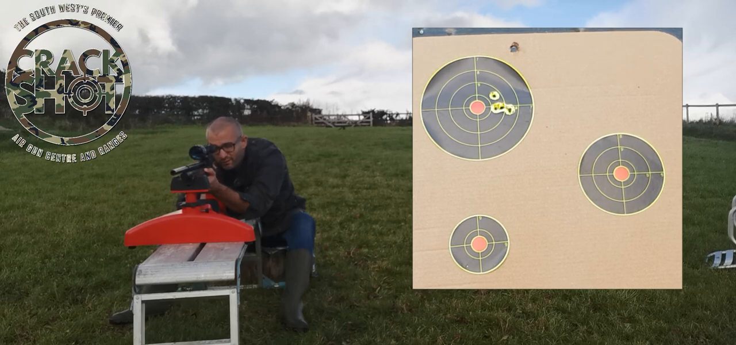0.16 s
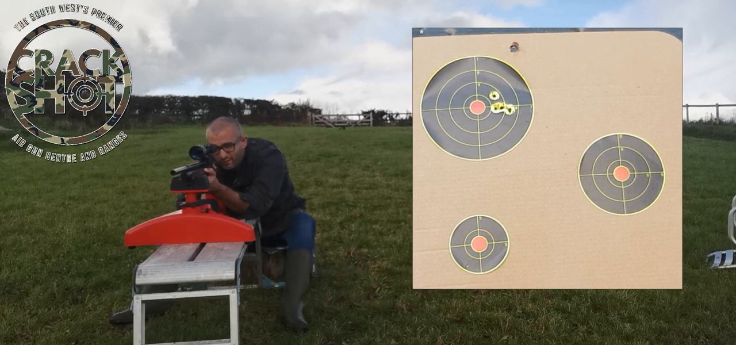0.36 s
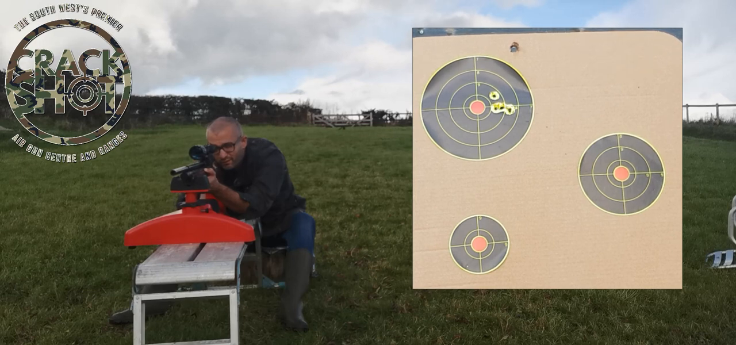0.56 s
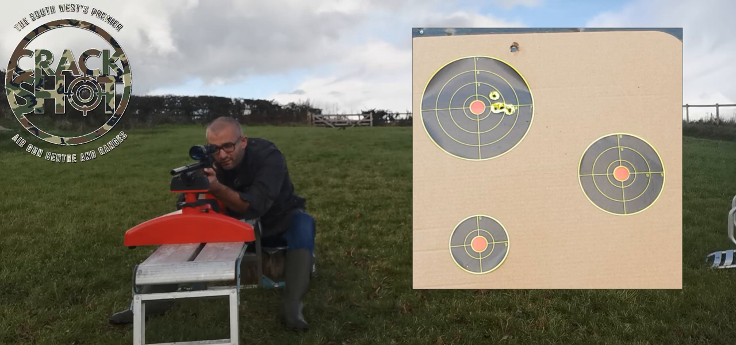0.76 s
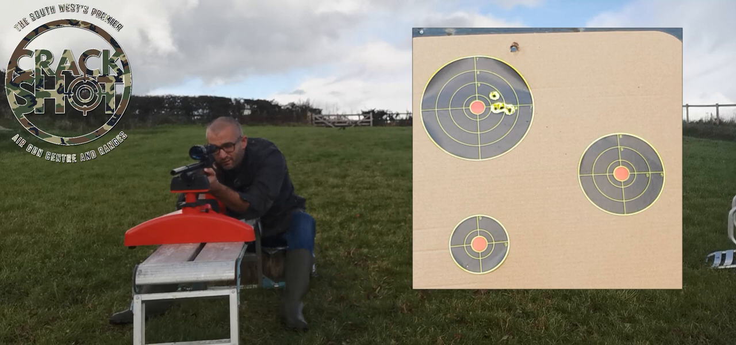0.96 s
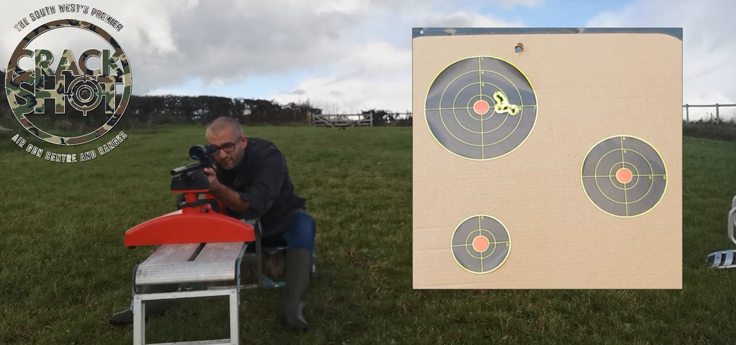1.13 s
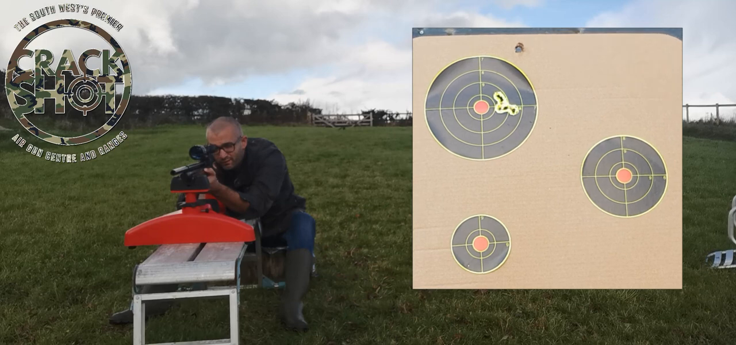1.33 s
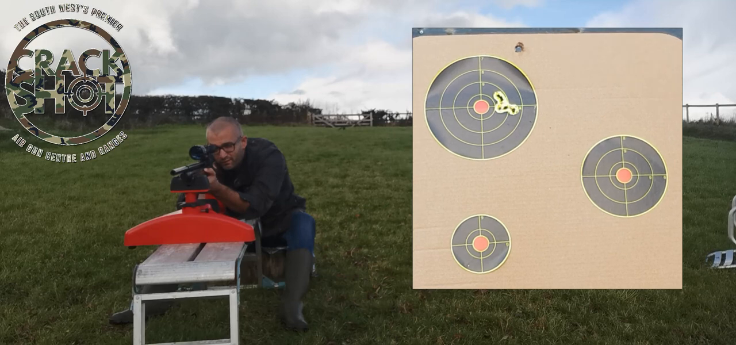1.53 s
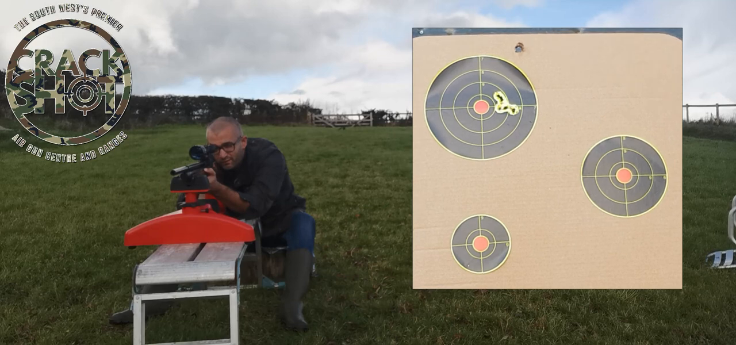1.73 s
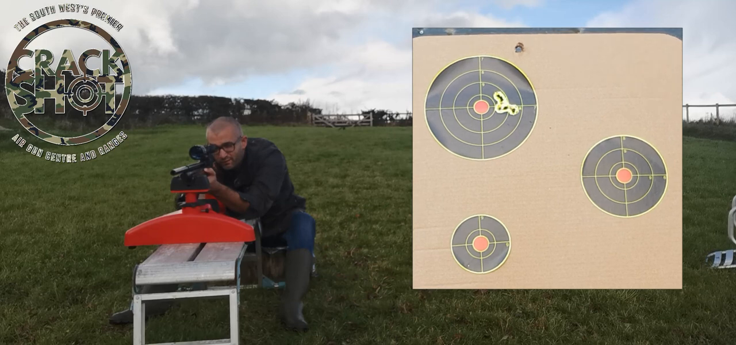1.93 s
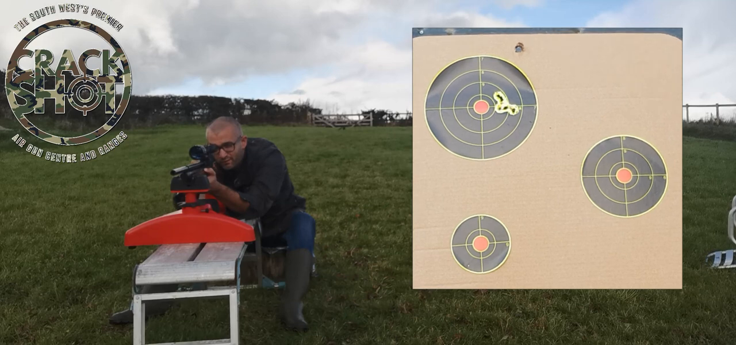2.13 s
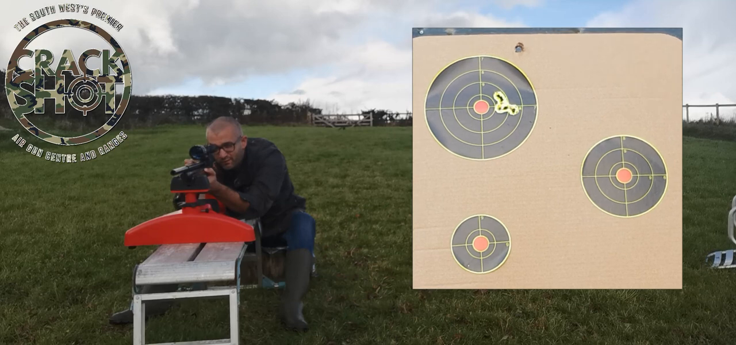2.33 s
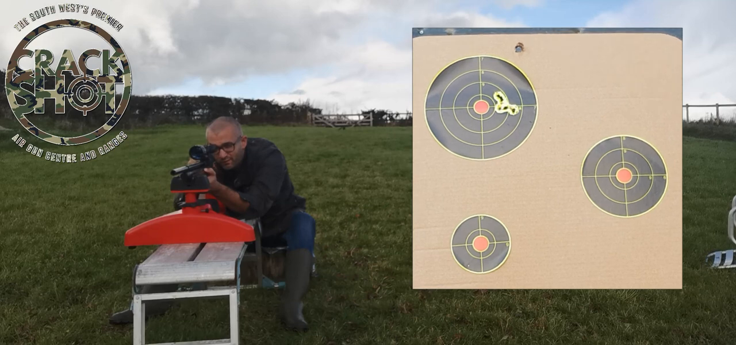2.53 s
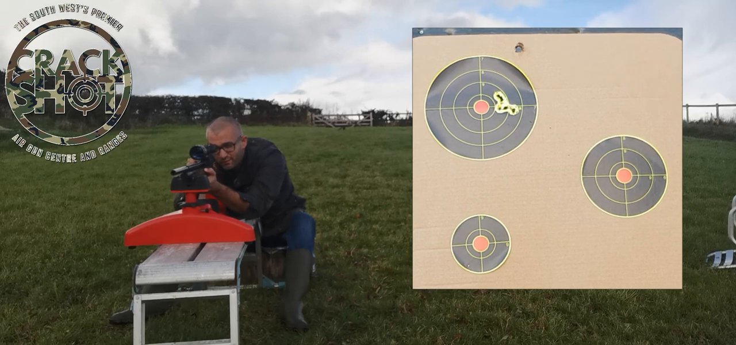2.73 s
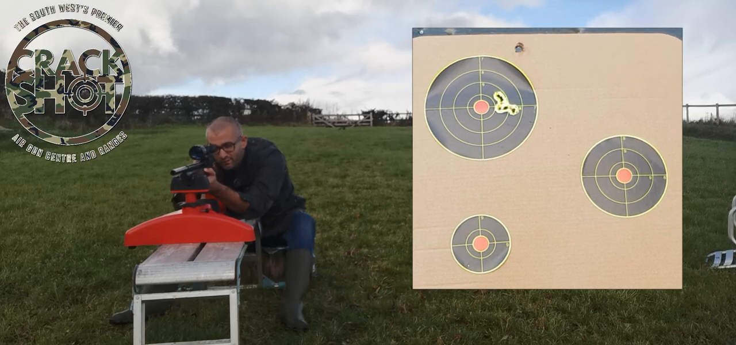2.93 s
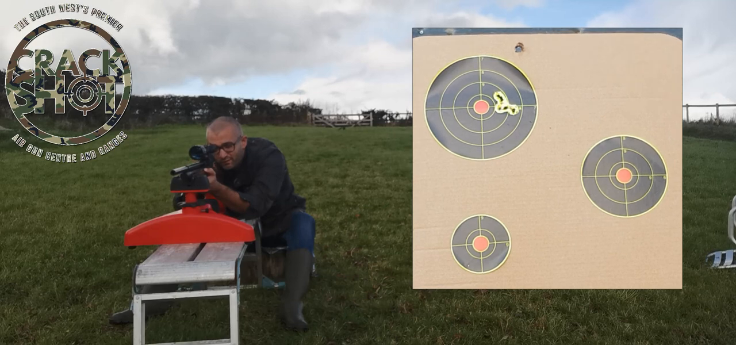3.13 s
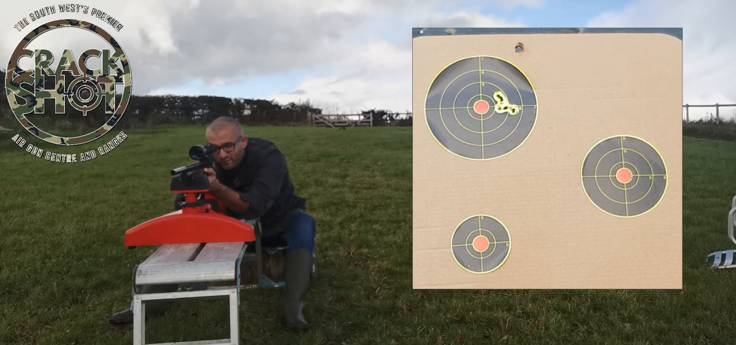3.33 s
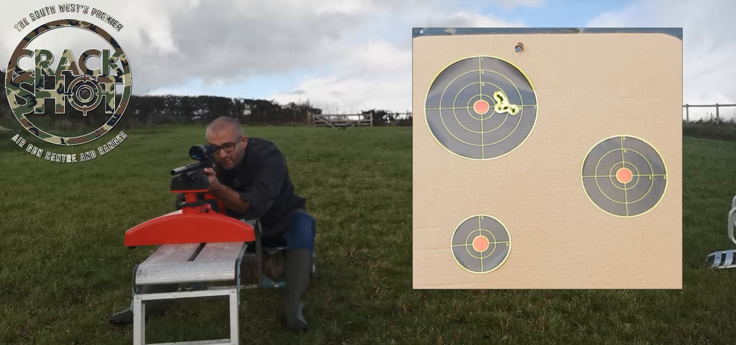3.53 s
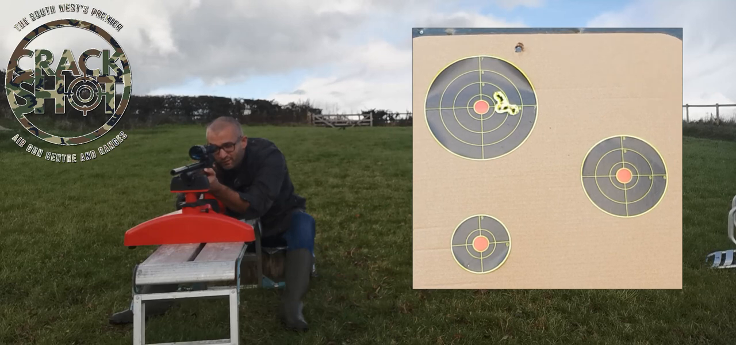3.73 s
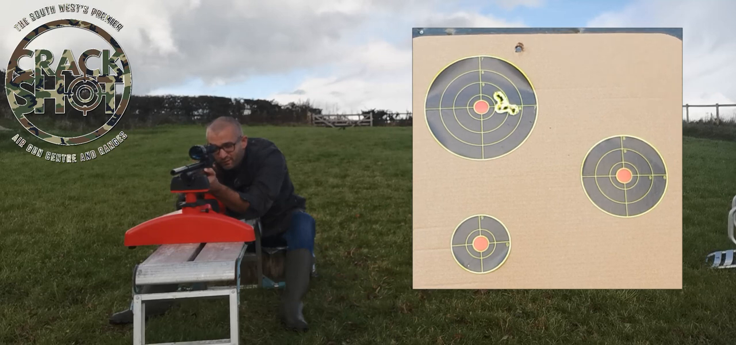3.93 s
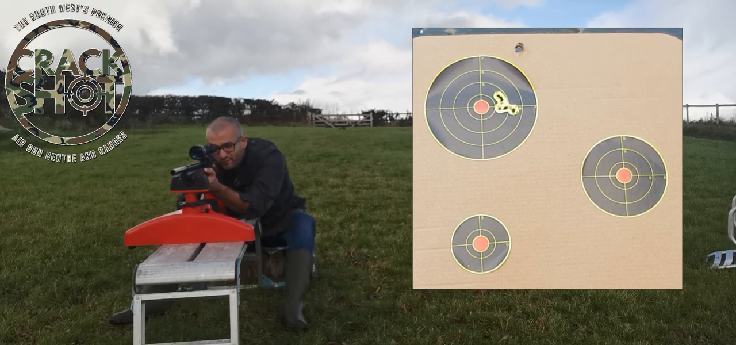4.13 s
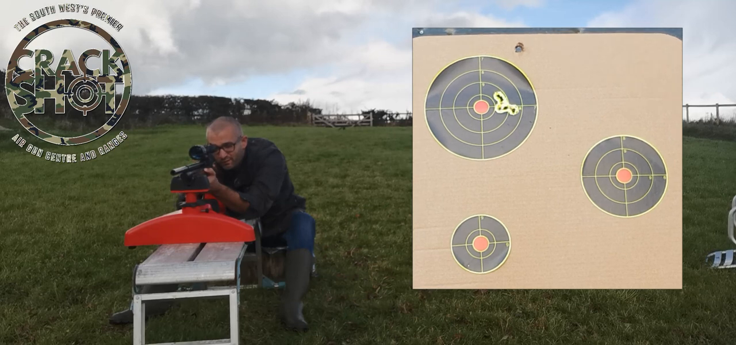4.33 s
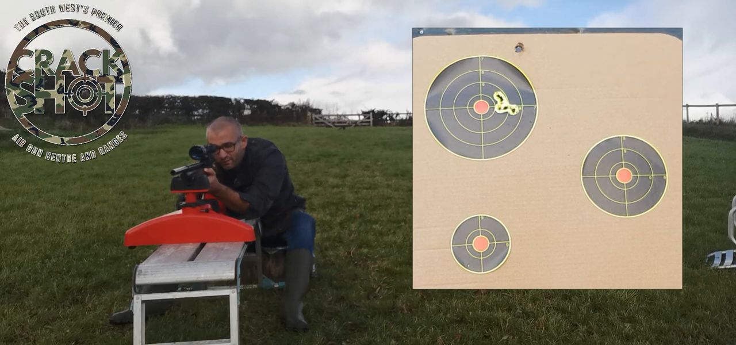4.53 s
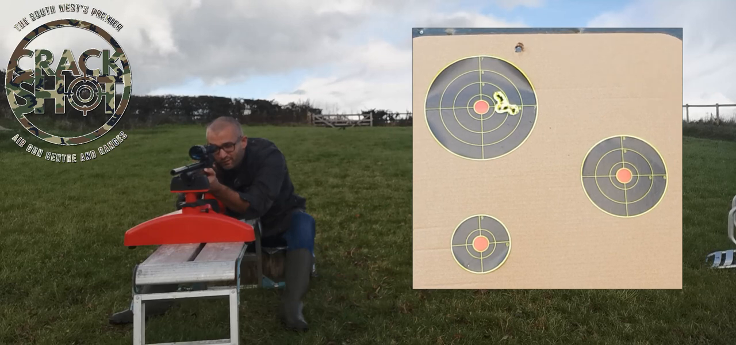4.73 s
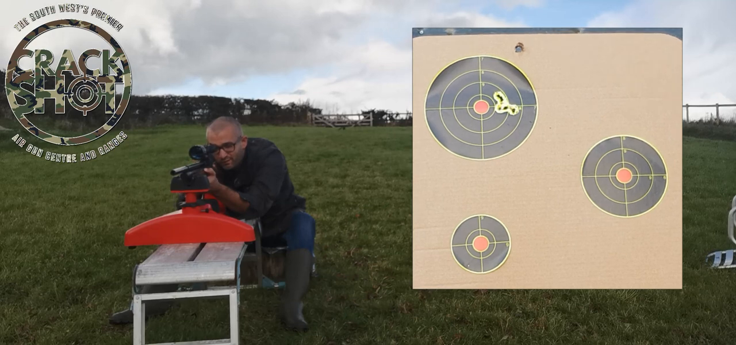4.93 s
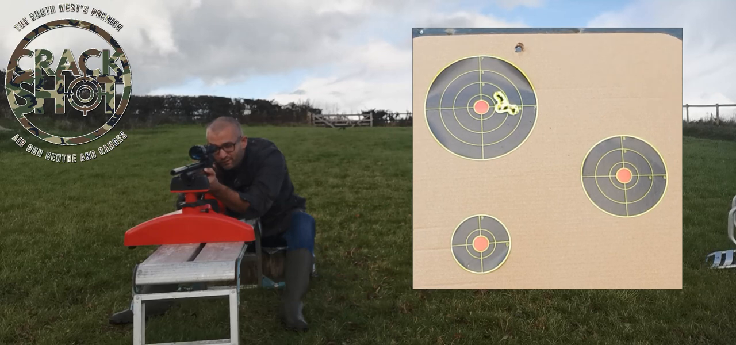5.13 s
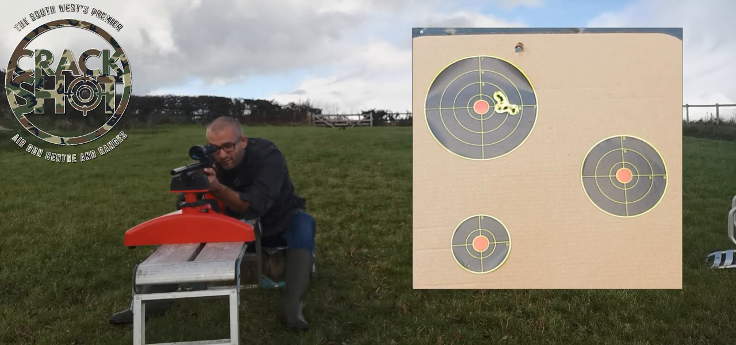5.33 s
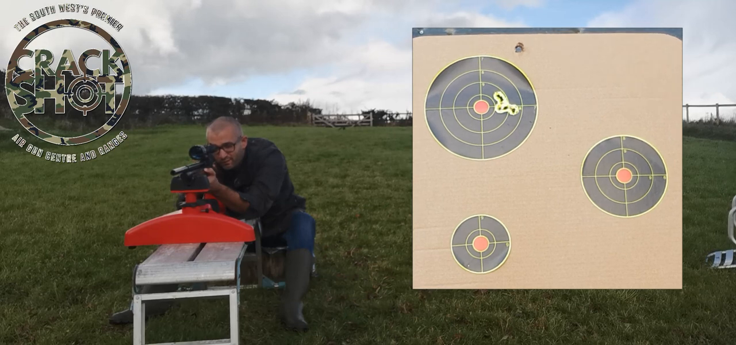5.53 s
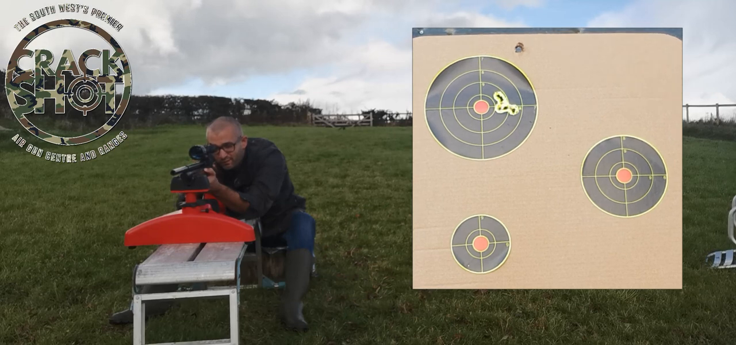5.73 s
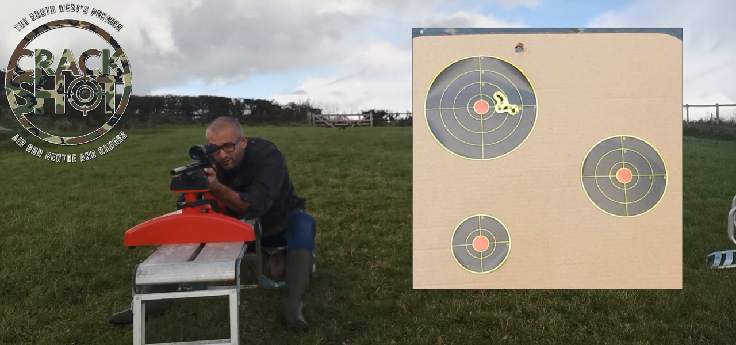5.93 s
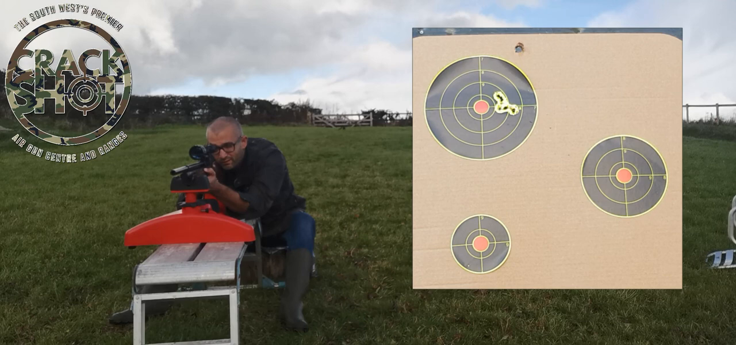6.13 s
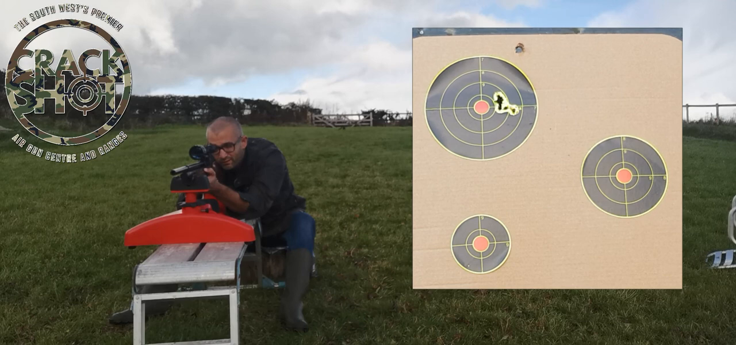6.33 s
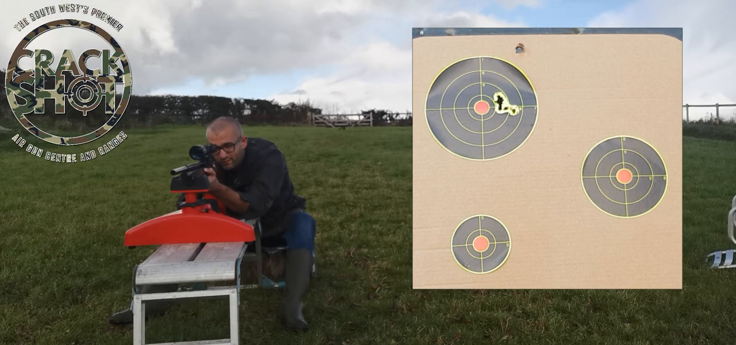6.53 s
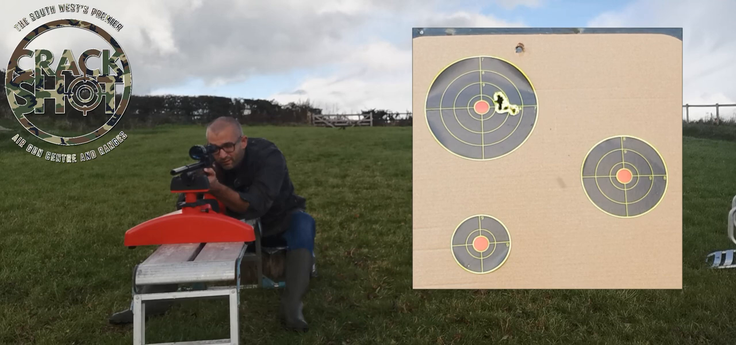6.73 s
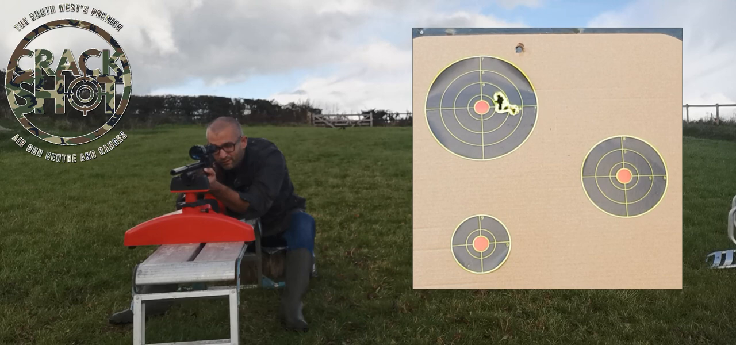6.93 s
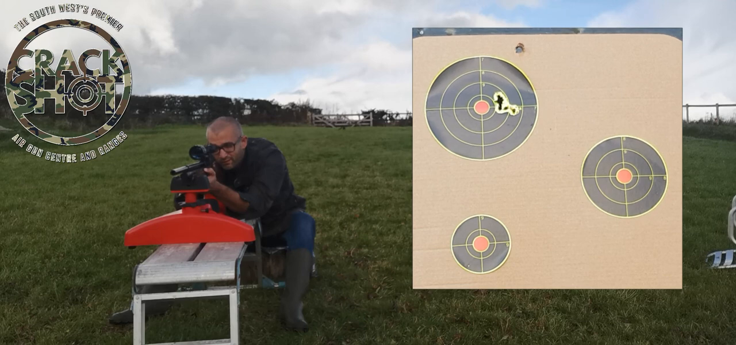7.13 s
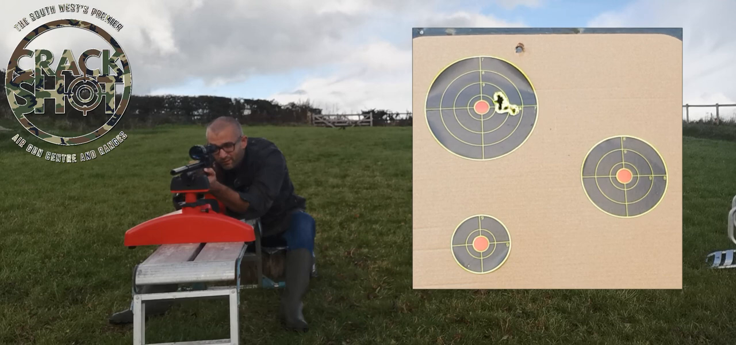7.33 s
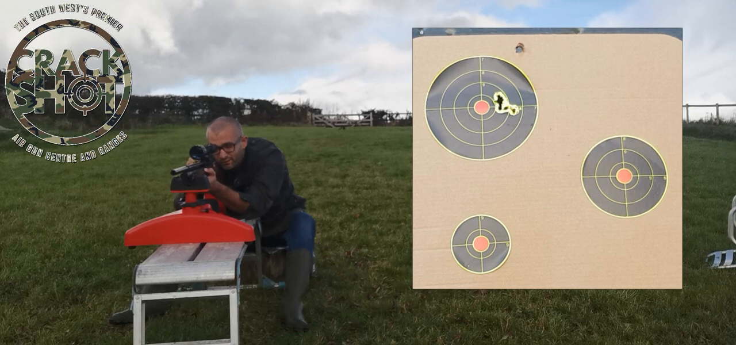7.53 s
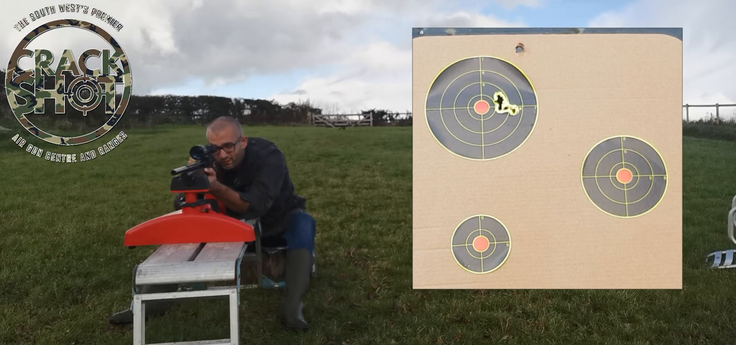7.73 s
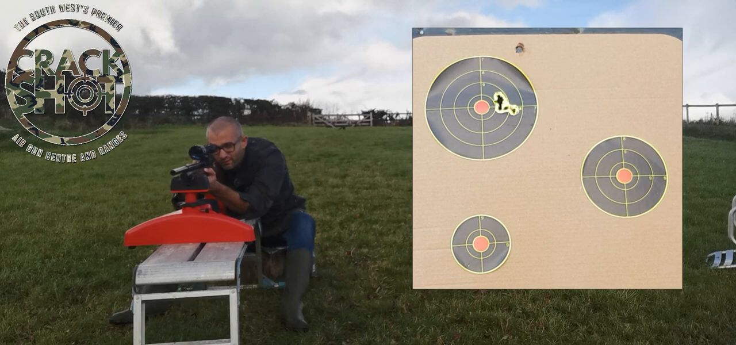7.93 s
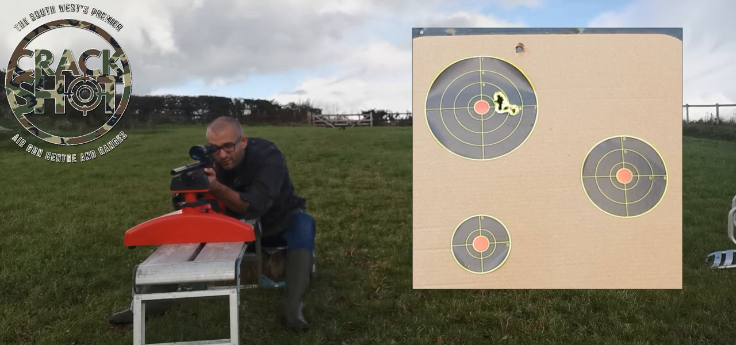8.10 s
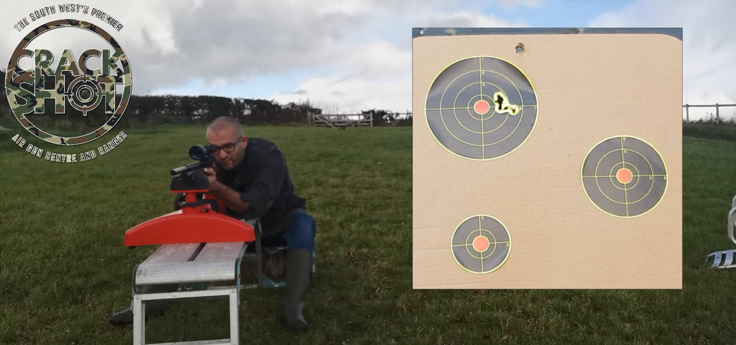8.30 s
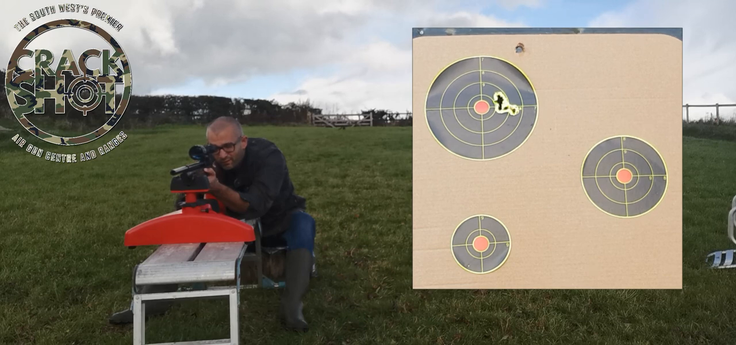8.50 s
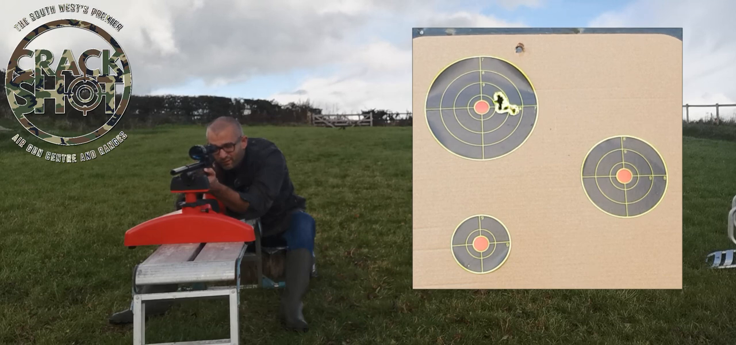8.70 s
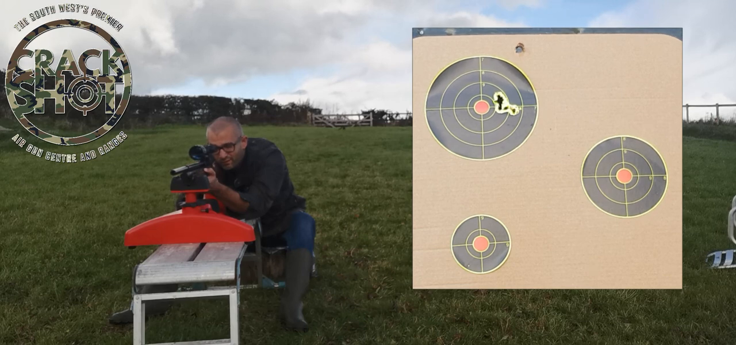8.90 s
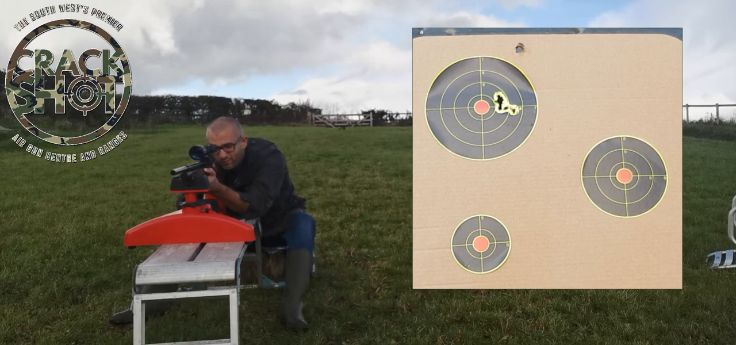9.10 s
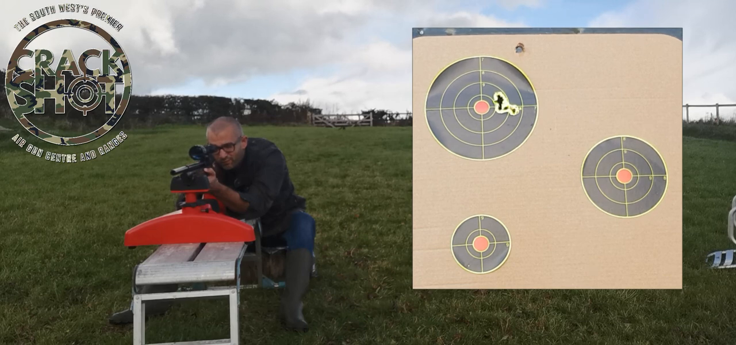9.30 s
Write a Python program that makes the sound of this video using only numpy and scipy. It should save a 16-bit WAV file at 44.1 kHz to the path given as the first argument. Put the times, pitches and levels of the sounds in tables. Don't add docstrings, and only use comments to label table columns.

```python
import sys
import numpy as np
from scipy import signal
from scipy.io import wavfile
from scipy.ndimage import uniform_filter1d

SR = 44100
rng = np.random.default_rng(int(sys.argv[2]) if len(sys.argv) > 2 else 0)


def linear_from_db(decibels):
    return 10 ** (np.asarray(decibels, float) / 20)


def transcribe(signal):
    frames = np.atleast_2d(signal).T
    limited = np.clip(frames, -1, 1)
    pcm = np.round(limited * 32767).astype(np.int16)
    wavfile.write(sys.argv[1], SR, pcm)


N = 412599

# pitch_hz, level_db (per Hz)
FIELD_COLOUR = [(20, -4), (35, -12), (60, -1.5), (120, -5.5), (190, -13), (400, -10.5), (950, -5.5),
                (1400, -11), (2100, -19.5), (3000, -24.5), (5700, -32.5), (9000, -38), (13000, -33),
                (16000, -36)]
# pitch_hz, likeness (-1..1)
FIELD_SAME = [(40, 0.079), (130, 0.65), (400, 0.99), (1200, 0.81), (3000, 0.24), (6000, 0.03)]
# time_s, level_db
TRAFFIC = [
    (0, 1.5),
    (5.5, 1),
    (6.6, 0.5),
    (9.4, 3),
]
# time_s, level_db
GUSTS = [
    (0, 1.5),
    (1.4, 1.5),
    (2.5, 1.5),
    (4.5, -1),
    (6.4, 1.5),
    (7.3, 5),
    (8, 0.5),
    (9.4, 1.5),
]
# pitch_hz, closest_s, level_db, half_width_s
DRONES = [
    (138, 5.1, -75, 0.39),
    (131, 7.2, -72.5, 1.5),
    (478, 5.35, -74.5, 0.29),
    (483, 8.8, -80.5, 0.44),
]
FIELD_DB = -62.5
DUCKS_DB, DUCK_FALL_S, DUCK_RECOVER_S = (-8, -2), .15, 0.35

# start_s, peak_db, pitch_hz, pan_db
PUFFS = [(0.253, -55, 85.6, 24.5), (1.855, -48, 115, 29), (2.02, -53, 99.6, 22), (2.186, -50, 127, 18),
         (2.268, -50, 61.2, 20), (2.365, -55, 56.5, -21), (2.478, -56, 53.6, 15), (2.953, -56, 72.7, -15),
         (3.387, -56, 100, -31), (3.455, -52.5, 96, -20), (5.069, -52, 167, 17.5), (6.979, -52, 91, -18),
         (7.349, -51, 53.8, -11.5), (7.412, -49.5, 102, -24), (7.53, -47, 84, -9), (8.78, -55, 111, -12),
         (9.095, -54.5, 70.0, -12)]

# start_s, peak_db
TICKS = [(4.4827, -68), (4.62, -66.5), (4.75, -70), (8.582, -65), (8.7654, -65), (8.923, -65),
         (9.2676, -68.5)]
# after_s, level_db
TOUCHES = [
    (-.087, -11),
    (-.035, -8.5),
    (0, 3),
    (.016, -8),
]
TICK_HZ, TICK_SPREAD_HZ = 6940, 110

# first_s, second_s, peak_db (of the steel), body_db and tick_db (relative to
BOLT = [(2.578, 7.636, -58, 7.5, 2), (2.696, 7.739, -38, -17, -9), (2.766, 7.808, -67, -8, 8),
        (2.863, 7.914, -47.5, 3, 1.5), (2.927, 7.980, -72, -5, 16), (2.944, 8.004, -73, -7, 19.5),
        (3.039, 8.091, -71.5, -10, 17.5), (3.099, 8.147, -34, -6, -6), (3.144, 8.196, -64, -8, -4),
        (3.167, 8.216, -67, 15.5, 15.5), (3.184, 8.235, -63, -1, 7)]
# pitch_hz, width_hz, level_db
STEEL = [(7120, 660, 13), (7130, 300, -39.5), (5340, 170, -12), (2830, 880, -5)]
# pitch_hz, width_hz, level_db
STOCK = [(1300, 580, 5), (830, 530, 2), (2340, 430, 1)]
LATCH_T60_S, SLIDE_T60_S, LATCH_ABOVE_DB, BOLT_PANS_DB = 0.03, 0.055, -49, (-1.5, -4)

# start_s, splash_peak_db, ring_hz, ring_peak_db, ring_t60_s
FRAGMENTS = [(1.174, -73, 5830, -27.5, 0.24), (1.387, -59, 6500, -57, .063), (1.402, -37, 5920, -48, 0.06),
             (1.719, -59, 2400, -55, 0.023), (1.801, -80, 2290, -58.5, .32),
             (6.466, -49, 6300, -25.5, 0.16), (6.55, -25, 4830, -38.5, 0.2), (6.655, -40, 5860, -49, 0.17),
             (6.674, -30, 6050, -44.5, 0.074), (6.746, -37, 4250, -52, 0.11), (6.9, -25, 6250, -33.5, 0.11),
             (7.01, -59, 6000, -52, 0.14), (7.037, -76, 6200, -53, .047), (7.213, -56, 3260, -56.5, 0.024),
             (7.222, -42, 6860, -50.5, 0.015)]
# start_s, ring_peak_db, clatter_peak_db, clatter_t60_s
CLANKS = [
    (6.7455, -37.5, -39, .18),
    (6.9005, -34.5, -38, .14),
]
# pitch_hz, level_db, t60_s
TRAYS = [
    [(2500, -5, .3), (2700, -2, .38), (2890, 0, .45), (3050, -4, .36)],
    [(1390, 0, .05), (1650, 0, .12), (1910, -8, .14), (4050, -7, .057)],
]
SPLASH_SHARE = 0.61
RATTLE_S, RATTLE_DB, RATTLE_T60_S = 6.55, -43.5, 1.54

# start_s, blow_db, long_ring_db, thud_hz, thud_db
STRIKES = [
    (1.0665, 1, -33, 260, -21),
    (6.3542, -1, -47, 295, -11),
]
# clap_db, body_db, body_t60_s, swell_after_s, swell_db
ROAR = [
    (-12, -19, 0.8, 0.131, -29.5),
    (-13.5, -22, 0.68, 0.096, -34.5),
]
# pitch_hz, level_db (per Hz)
ROAR_COLOUR = [(60, -32), (95, -21.5), (190, -27.5), (300, -21.5), (390, -8.5), (580, -8), (900, -6.5),
               (1400, -9.5), (2400, -5.5), (4000, -15.5), (5600, -15.5), (8500, -22.5), (16000, -22)]
# pitch_hz, share of the treble loss (ratio)
DAMPING = [(60, -.1), (170, -.4), (330, .12), (600, 0), (1100, .1), (2300, .45), (3000, .8), (4500, 1.0),
           (7500, 1.3), (9000, 1.9), (16000, 2.9)]
# pitch_hz, likeness (-1..1)
ROAR_SAME = [(60, .7), (600, .6), (1500, .45), (4000, .45), (15000, .45)]
# pitch_hz, level_db, t60_s
PLATE = [(296, -16, 2.4), (382, -9, 1.1), (415, -16, 1.8), (490, -13, 1.4), (540, -6, 2.0), (586, -6, 1.1),
         (648, -8, 1.6), (693, -11, 1.5), (750, -5, 2.0), (807, -6, .8), (855, -9, 1.3), (931, -11, 1.2),
         (1022, -2, 1.4), (1163, -8, .9)]
# pitch_hz, level_db, t60_s
PANEL = [(587, -7, 0.99), (641, -3, 0.54), (732, -5, 0.43), (765, -2, 0.37), (850, -11.5, 1.3),
         (990, -5, 0.43), (1058, -5.5, 1.2), (1190, -14, 0.31), (1220, -6.5, 0.25), (1350, 0.5, 0.14),
         (1400, -14, 0.65), (1440, -7, 0.3)]
PANEL_DB = 8
THUD_T60_S, CLAP_T60_S, ROAR_S = .07, 0.14, 1.1
SWELL_WIDTH_S = 0.083
TREBLE_LOSS_DB_PER_S = (62.5, 57)
CAVITY_HZ, CAVITY_WIDTH_HZ, CAVITY_DB, CAVITY_GROW_DB_PER_S = 619.5, 380, -7.5, 20
CRACKLE_DB, CRACKLE_S = 1.4, .007

# left_db (by the first echo), closest_db, closest_s (before the slam)
WHIZZ = [
    (-49.5, -32, 0.0013),
    (-46, -36.5, .009),
]
# pitch_hz, level_db (per Hz)
WHIZZ_COLOUR = [(200, -11), (500, -1), (1100, -13.5), (2500, -5), (6000, -4), (12000, -5), (16000, -6)]
WHIZZ_FADE_DB_PER_S, WHIZZ_GROW_DB_PER_S, WHIZZ_STEADY_DB = 201.5, 599.5, -54
HUM_HZ, HUM_WIDTH_HZ, HUM_DB = 500, 60, -15

# start_s, peak_db
SHOTS = [
    (0.8782, -15.5),
    (6.1657, -15),
]
# delay_s, level_db, pulse_hz
MUZZLE = [
    (-.0018, -17, 1500),
    (0, 0, 5500),
    (.0017, -5, 5800),
]
# delay_s, level_db, dulled_above_hz, scatter_t60_s
ECHOES = [(.068, -5.5, 3400, 0.0552), (.073, -8.5, 2900, 0.079), (.078, -12.5, 2900, .1),
          (0.0963, -18.5, 4000, 0.074), (.102, -21, 3500, .1), (.108, -22.5, 3500, 0.13)]
GROUND_S, GROUND_DB = .0052, -3


def evened(x):
    return x / np.sqrt(np.mean(x ** 2) + 1e-20)


def peaked(x):
    return x / abs(x).max()


def read(points, hz):
    f, value = np.transpose(points)
    return np.interp(np.log(hz + 1), np.log(f + 1), value)


def summed(*levels_db):
    return 10 * np.log10(sum(linear_from_db(db) ** 2 for db in levels_db))


def add(mix, s, sound, pan_db=0, lag=0):
    for side, (row, sign) in enumerate(zip(sound * np.ones((2, 1)), (1, -1))):
        part = mix[side, round(s * SR) + side * lag:][:len(row)]
        part += linear_from_db(sign * pan_db / 2) * row[:len(part)]


def dulled(x, hz, kind="low"):
    return signal.lfilter(*signal.butter(2, np.clip(hz, 20, 20000), kind, fs=SR), x)


def resonate(x, hz, width):
    turn = np.exp(2j * np.pi * hz * np.arange(x.shape[-1]) / SR)
    r = np.exp(-np.pi * width / SR)
    return 2 * (turn * signal.lfilter([1 - r], [1, -r], x / turn)).real


def resonate_twice(x, hz, width, next_width):
    return resonate(resonate(x, hz, width), hz, next_width)


def noise(count, size, level_db, same, lag=0, patchy_db=0):
    hop = size // 4
    t = np.arange(count // hop + 5)[None] * hop / SR
    hz = np.fft.rfftfreq(size, 1 / SR)[:, None]
    a, b, c, d, patches = rng.standard_normal((t.size, hz.size, 5)).T
    patches = uniform_filter1d(patches, size=5, axis=0)
    patches = evened(uniform_filter1d(patches, size=9, axis=1))
    like = np.clip(read(same, hz), -1, 1)
    left = a + 1j * b
    right = like * left * np.exp(-2j * np.pi * hz * lag / SR)
    right = right + np.sqrt(1 - like ** 2) * (c + 1j * d)
    z = np.array([left, right]) * linear_from_db(level_db(t, hz) + patchy_db * patches)
    return signal.istft(z, nperseg=size, noverlap=size - hop)[1][:, :count]


def burst(t60, rise=0.00013, count=SR // 2):
    t = np.arange(count) / SR
    z = rng.standard_normal((3, count))
    fall = linear_from_db(-60 * t / np.clip(t60, .01, .9))
    return (.8 * z[0] + .6 * z[1:]) * (1 - np.exp(-t / rise)) * fall


def ducking(t):
    gain_db = 0
    for (s, *_), db in zip(STRIKES, DUCKS_DB):
        since = np.maximum(t - s, 0)
        gain_db = gain_db + db * (1 - np.exp(-since / DUCK_FALL_S)) * np.exp(-since / DUCK_RECOVER_S)
    return gain_db


def field():
    def level(t, hz):
        road = np.interp(t, *np.transpose(TRAFFIC)) / (1 + (hz / 3000) ** 2)
        gusts = np.interp(t, *np.transpose(GUSTS)) / (1 + (hz / 200) ** 2)
        return read(FIELD_COLOUR, hz) + road + gusts + ducking(t)

    t = np.arange(N) / SR
    out = linear_from_db(FIELD_DB) * evened(noise(N, 2048, level, FIELD_SAME, lag=18, patchy_db=1.86))
    preamp_hiss = dulled(rng.standard_normal((2, N)), 11500, "high")
    out += linear_from_db(-77.5 + ducking(t)) * preamp_hiss
    for hz, s, db, width_s in DRONES:
        near = 1 / (1 + ((t - s) / width_s) ** 4)
        engine = resonate_twice(rng.standard_normal(N), hz, 8.9, 20)
        out += linear_from_db(db) * near * evened(engine)
    return out * linear_from_db(np.array([[.7], [-.7]]))


def wind():
    out, t = np.zeros((2, N)), np.arange(3000) / SR
    for s, db, hz, pan_db in PUFFS:
        u = 2 * np.pi * max(hz, 70) * t - 5.0
        add(out, s, linear_from_db(db - 8.0) * np.sin(-u) * np.exp(-(u / 3.3) ** 2), pan_db)
    return out


def swivel():
    out = np.zeros((2, N))
    for s, db in TICKS:
        for after, touch_db in TOUCHES:
            hz = TICK_HZ + TICK_SPREAD_HZ * rng.standard_normal()
            tick = resonate_twice(burst(0.047, rise=0.0019, count=4000), hz, 940, 1500)
            add(out, s + after, linear_from_db(db + touch_db + 5.5) * peaked(tick), pan_db=-7.5, lag=8)
    return out


def struck(knock, modes):
    return sum(linear_from_db(db) * evened(resonate_twice(knock, hz, w, 2 * w)) for hz, w, db in modes)


def bolt():
    out = np.zeros((2, N))
    for *times, db, body_db, tick_db in BOLT:
        t60 = LATCH_T60_S if db > LATCH_ABOVE_DB else SLIDE_T60_S
        for s, pan_db in zip(times, BOLT_PANS_DB):
            knock = burst(t60, rise=0.000087, count=5000)
            tick = dulled(burst(1.45 * t60, count=5000), 1800, "high")
            tick += linear_from_db(12) * resonate_twice(tick, 4600, 2500, 3500)
            sound = peaked(struck(knock, STEEL))
            sound = sound + linear_from_db(body_db) * peaked(struck(knock, STOCK))
            sound = sound + linear_from_db(tick_db) * peaked(tick)
            add(out, s - .0005, linear_from_db(db - 0.5) * sound, pan_db, lag=5)
    return out


def fragments():
    out = np.zeros((2, N))
    for s, db, hz, ring_db, t60 in FRAGMENTS:
        splash = dulled(burst(SPLASH_SHARE * t60, rise=0.00093, count=11000), 1450, "high")
        ring = resonate_twice(burst(t60, rise=.001, count=11000), hz, hz ** 2 / 20000, hz / 3)
        sound = linear_from_db(db - 10.5) * peaked(splash) + linear_from_db(ring_db + 4.0) * peaked(ring)
        add(out, s, sound, pan_db=2.0, lag=10)
    for (s, db, clatter_db, clatter_t60), tray in zip(CLANKS, TRAYS):
        clatter = dulled(dulled(burst(clatter_t60, rise=.0002), 860, "high"), 3300)
        add(out, s, linear_from_db(clatter_db) * peaked(clatter), pan_db=4.0, lag=10)
        for hz, mode_db, t60 in tray:
            ring = resonate_twice(burst(t60, rise=0.00038), hz, 120, 640)
            add(out, s, linear_from_db(db + mode_db) * peaked(ring), pan_db=4.5, lag=10)
    t = np.arange(SR) / SR
    trickle = dulled(dulled(rng.standard_normal((2, SR)), 350, "high"), 1730)
    fall = linear_from_db(RATTLE_DB - 60 * t / RATTLE_T60_S) * signal.windows.tukey(SR, .3)
    add(out, RATTLE_S, evened(trickle) * fall)
    return out


def plate_roar(t, strike_roar, loss_db):
    def colour(u, hz):
        return read(ROAR_COLOUR, hz) - read(DAMPING, hz) * loss_db * np.minimum(u, ROAR_S)

    clap_db, body_db, t60, swell_s, swell_db = strike_roar
    clap = clap_db - 60 * t / CLAP_T60_S
    body = body_db - 60 * t / t60
    swell = swell_db - 10 * np.minimum(((t - swell_s) / SWELL_WIDTH_S) ** 2, 20)
    modes = noise(len(t), 512, colour, ROAR_SAME, lag=9, patchy_db=2.2)
    modes *= np.clip((ROAR_S - t) / 0.24, 0, 1)
    cavity = resonate_twice(modes, CAVITY_HZ, CAVITY_WIDTH_HZ, 2 * CAVITY_WIDTH_HZ)
    cavity = cavity * linear_from_db(CAVITY_DB + CAVITY_GROW_DB_PER_S * np.minimum(t, .3))
    crackle = evened(uniform_filter1d(rng.standard_normal(len(t)), round(CRACKLE_S * SR)))
    return (modes + cavity) * linear_from_db(summed(clap, body, swell) + 3 + CRACKLE_DB * crackle)


def plate_rings(t, ring_db):
    rings = 0
    for hz, db, t60 in PLATE + [(f, g + PANEL_DB, min(r, .8)) for f, g, r in PANEL]:
        phase = rng.uniform(0, 6.6) + np.array([[0], [.6]])
        rings = rings + linear_from_db(ring_db + db - 60 * t / t60) * np.sin(2 * np.pi * hz * t + phase)
    rings = rings * (1 - np.exp(-t / 0.12)) * linear_from_db(np.array([[1.5], [-1.5]]))
    return rings * np.clip((t[-1] - t) / .3, 0, 1)


def backstop():
    out, count = np.zeros((2, N)), 3 * SR // 2
    t = np.arange(count) / SR
    for strike, strike_roar, loss_db in zip(STRIKES, ROAR, TREBLE_LOSS_DB_PER_S):
        s, blow_db, ring_db, thud_hz, thud_db = strike
        roar = plate_roar(t, strike_roar, loss_db)
        thud = evened(resonate_twice(rng.standard_normal(count), thud_hz, 200, 300))
        roar += linear_from_db(thud_db - 60 * t / THUD_T60_S) * thud
        roar *= np.clip(t / .0006 - 1, 0, 1)
        u = (t - .0004) / .0002
        shock = linear_from_db(blow_db) * (1 - u ** 2) * np.exp(-u ** 2 / 2)
        add(out, s, roar + shock + plate_rings(t, ring_db), pan_db=0.72)
    ceiling = .8
    return dulled(ceiling * np.tanh(out / ceiling), 70, "high")


def pellet():
    out = np.zeros((2, N))
    for (shot, _), (lands, *_), (left_db, near_db, early) in zip(SHOTS, STRIKES, WHIZZ):
        t = np.arange(shot + ECHOES[0][0], lands - early, 1 / SR)
        leaving = left_db - WHIZZ_FADE_DB_PER_S * (t - t[0])
        nearing = near_db - WHIZZ_GROW_DB_PER_S * (t[-1] - t)
        db = summed(leaving, WHIZZ_STEADY_DB, nearing)
        hiss = noise(5400, 256, lambda u, hz: read(WHIZZ_COLOUR, hz) + 0 * u, ROAR_SAME)[:, :len(t)]
        hum = evened(resonate_twice(hiss[:1], HUM_HZ, HUM_WIDTH_HZ, HUM_WIDTH_HZ))
        whizz = (evened(hiss) + linear_from_db(HUM_DB) * hum) * linear_from_db(db + 4.5)
        add(out, t[0], whizz * signal.windows.tukey(len(t), .05))
    return out


def report():
    t, out = np.arange(1400) / SR - .003, np.zeros((2, 1400))
    for s, db, hz in MUZZLE:
        u = 2 * np.pi * hz * (t - s)
        out += linear_from_db(db) * -u * np.exp(.5 - u ** 2 / 2)
        puff = rng.standard_normal((2, 1400)) * (t > s) * linear_from_db(-60 * abs(t - s) / .025)
        out += linear_from_db(db - 19) * puff
    tube = linear_from_db(-2) * resonate(out, 7000, 1300)
    tube += linear_from_db(6.5) * resonate(resonate(out, 410, 200), 460, 300)
    tube += linear_from_db(4.0) * resonate(out, 110, 80)
    out += tube
    bounce = round(GROUND_S * SR)
    out[:, bounce:] += linear_from_db(GROUND_DB) * out[:, :-bounce]
    return out * np.cos(np.linspace(0, np.pi / 2, 1400)) ** 2


def rifle():
    out = np.zeros((2, N))
    for s, db in SHOTS:
        crack = linear_from_db(db + 9.5) * dulled(report(), 8300)
        add(out, s - .003, crack, lag=7)
        add(out, s, linear_from_db(db - 43.5) * dulled(burst(.35), 7000))
        for delay, echo_db, dull_hz, t60 in ECHOES:
            taps = linear_from_db(-26.5) * burst(t60, count=9000)
            taps[:, [0, 16]] = 1, .7
            back = signal.fftconvolve(crack[:1, :190], taps, axes=1)
            back += linear_from_db(5.5) * resonate_twice(back, 430, 170, 260)
            add(out, s + delay - .003, linear_from_db(echo_db) * dulled(back, dull_hz))
    return dulled(out, 77, "high")


def scene():
    return field() + wind() + swivel() + bolt() + fragments() + backstop() + pellet() + rifle()


def low_pass(x):
    return signal.sosfilt(signal.butter(12, 16800, fs=SR, output="sos"), x)


def record(dry):
    edge = signal.firwin(255, 15950, window=("kaiser", 5), fs=SR)
    mix = signal.oaconvolve(dry, edge[None], "same")
    return low_pass(mix)


dry = scene()
out = record(dry)
transcribe(out)
```